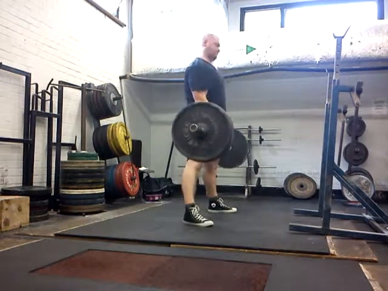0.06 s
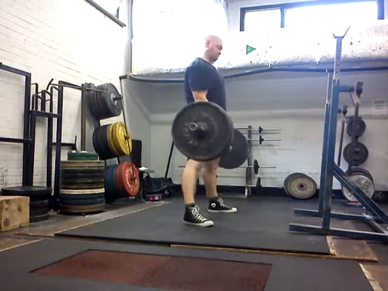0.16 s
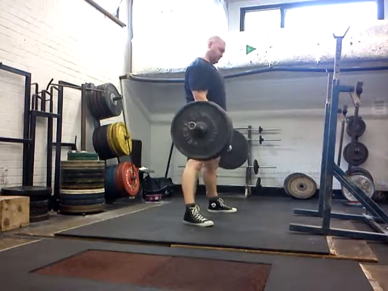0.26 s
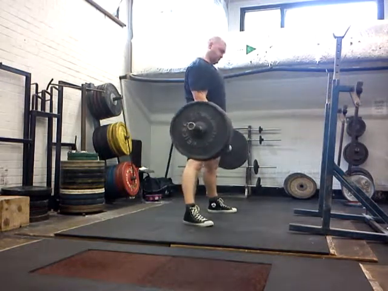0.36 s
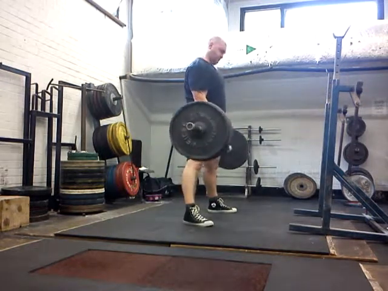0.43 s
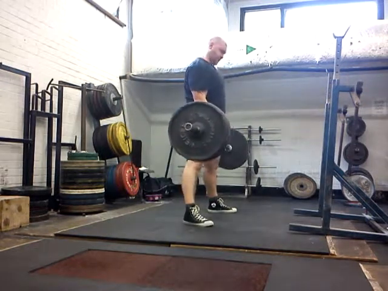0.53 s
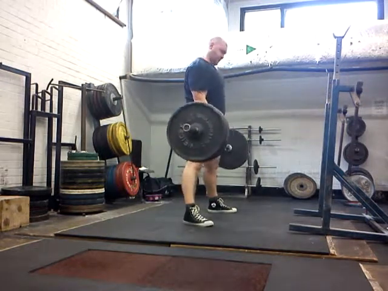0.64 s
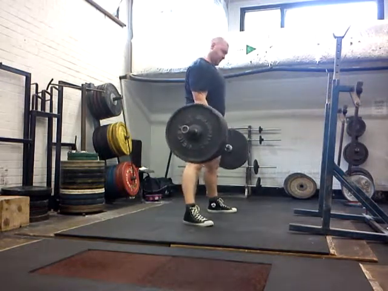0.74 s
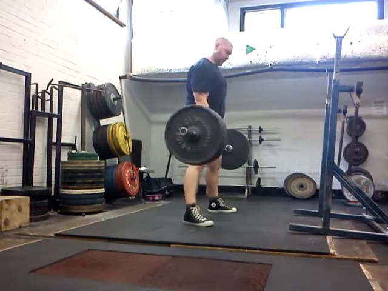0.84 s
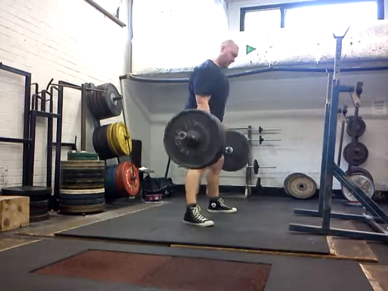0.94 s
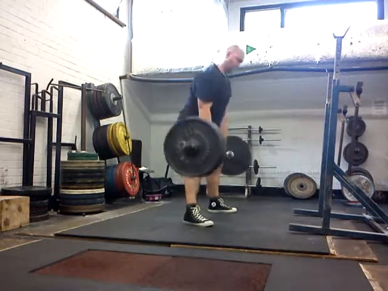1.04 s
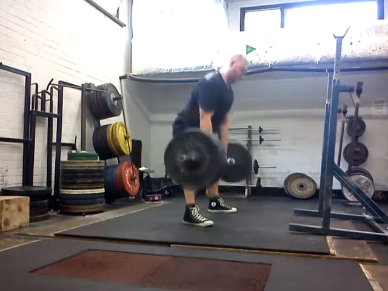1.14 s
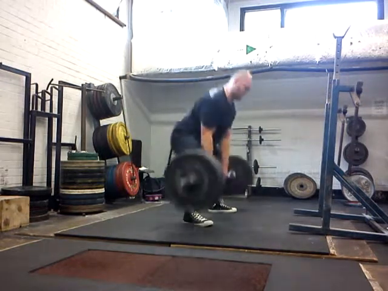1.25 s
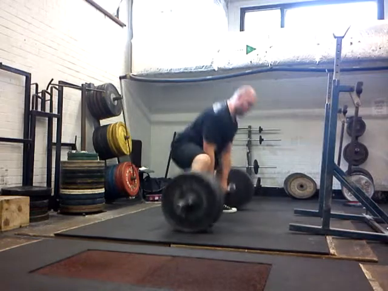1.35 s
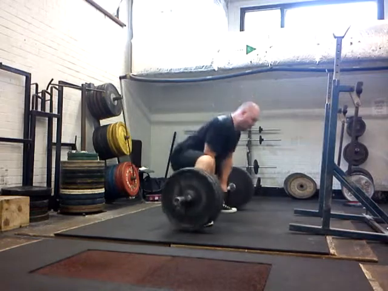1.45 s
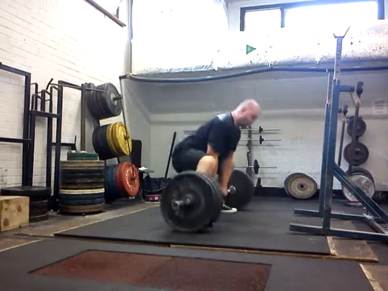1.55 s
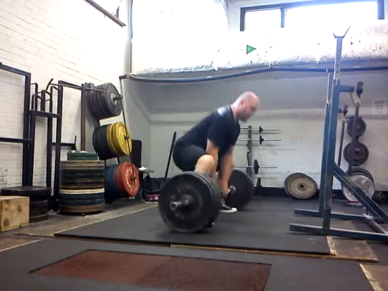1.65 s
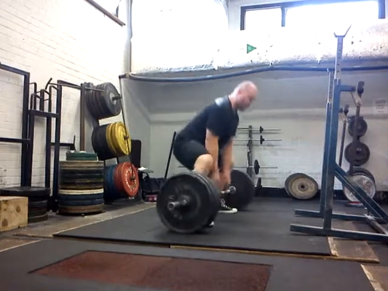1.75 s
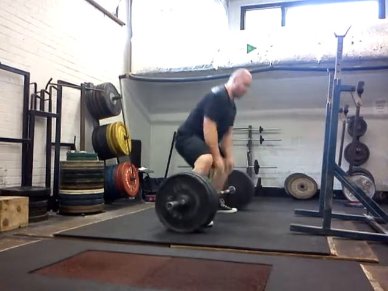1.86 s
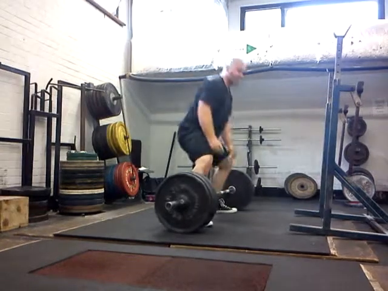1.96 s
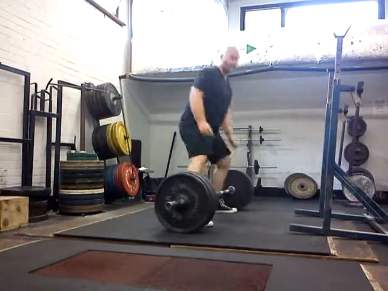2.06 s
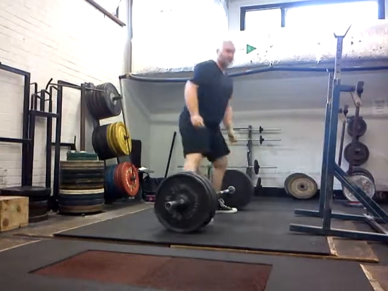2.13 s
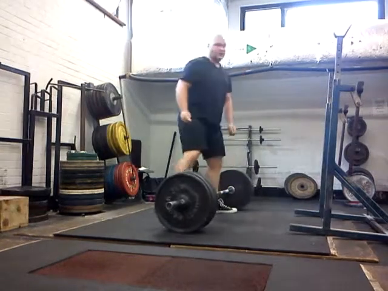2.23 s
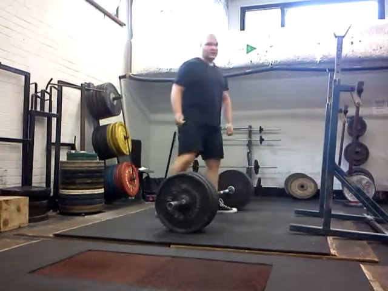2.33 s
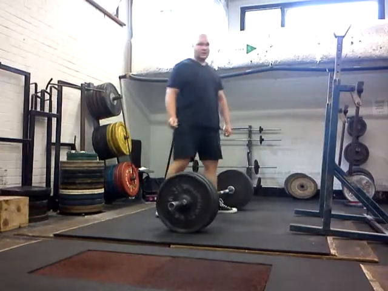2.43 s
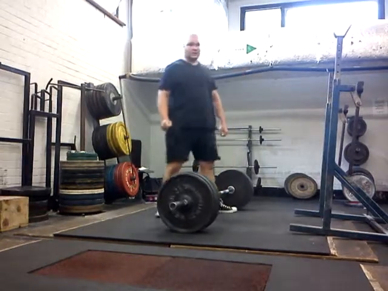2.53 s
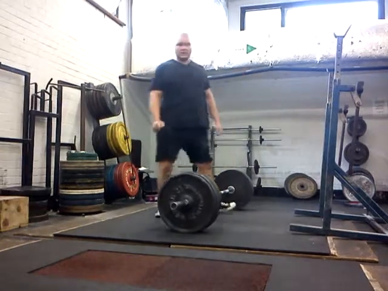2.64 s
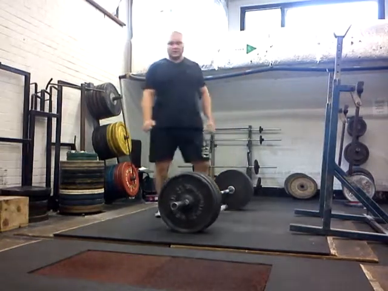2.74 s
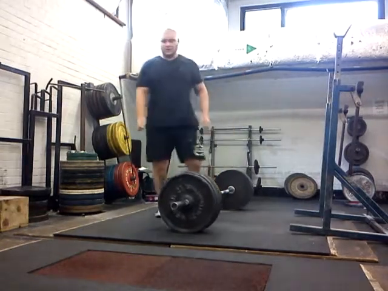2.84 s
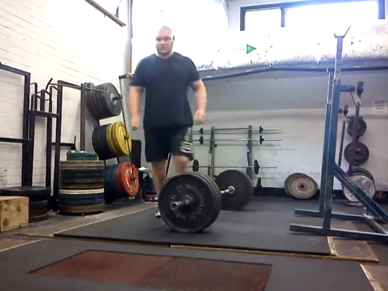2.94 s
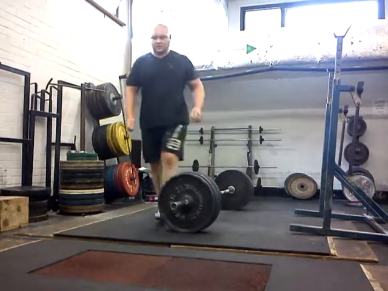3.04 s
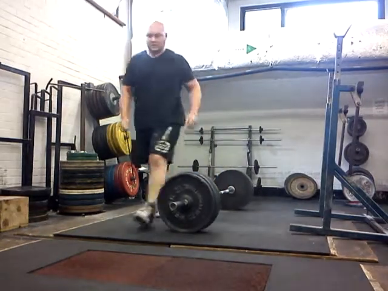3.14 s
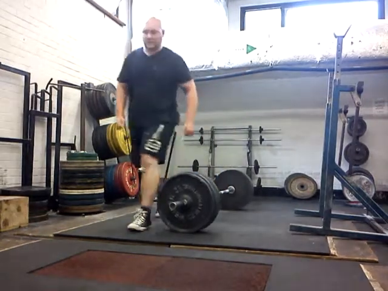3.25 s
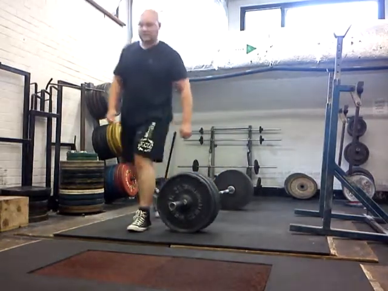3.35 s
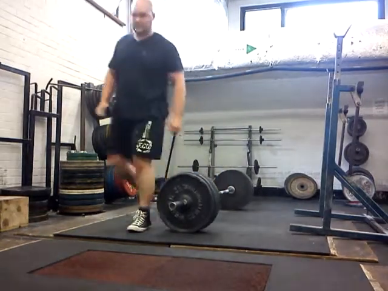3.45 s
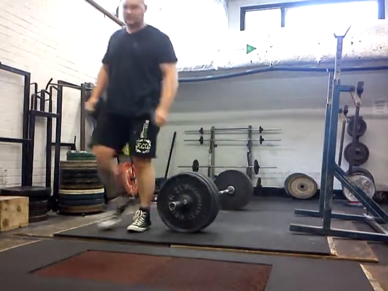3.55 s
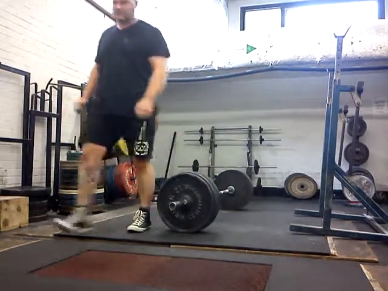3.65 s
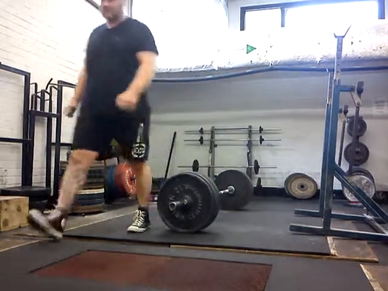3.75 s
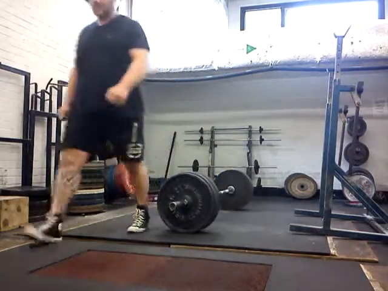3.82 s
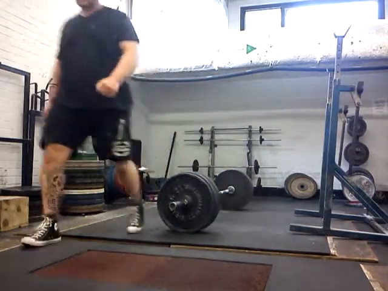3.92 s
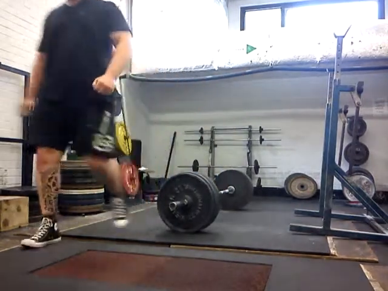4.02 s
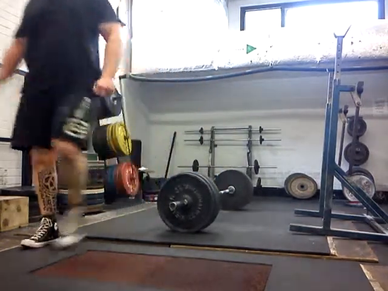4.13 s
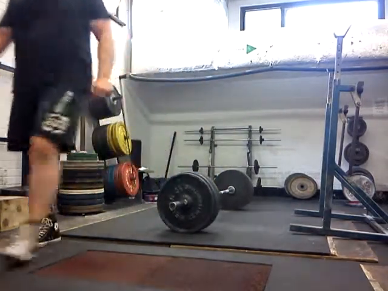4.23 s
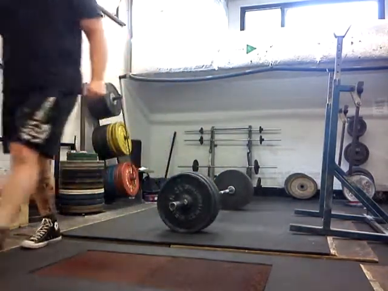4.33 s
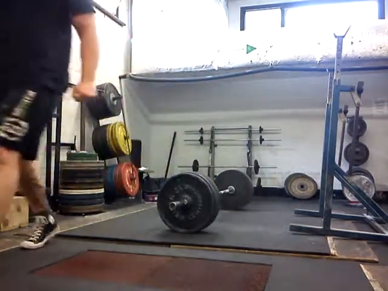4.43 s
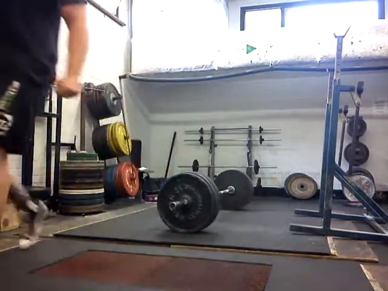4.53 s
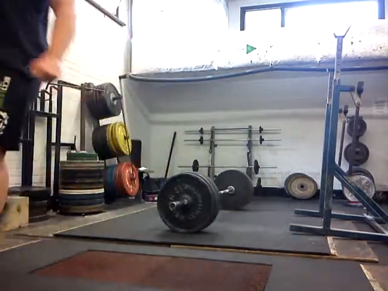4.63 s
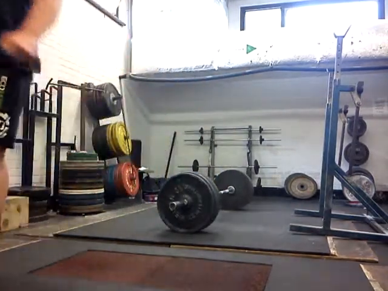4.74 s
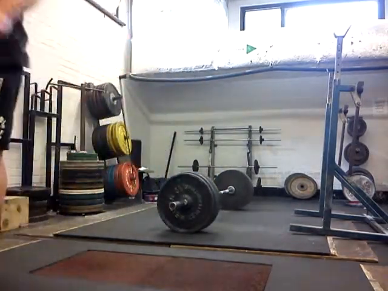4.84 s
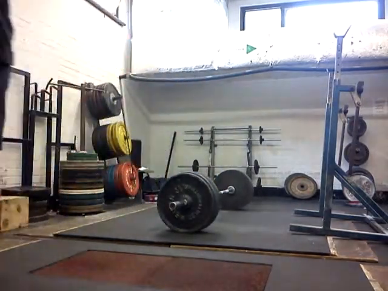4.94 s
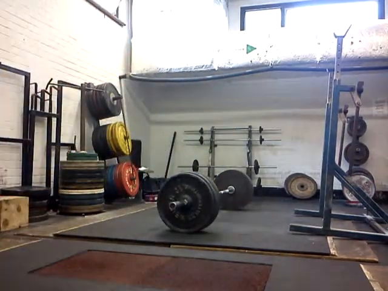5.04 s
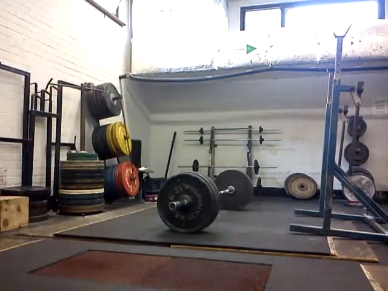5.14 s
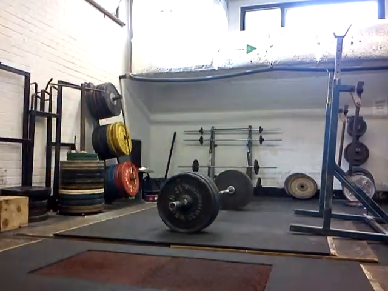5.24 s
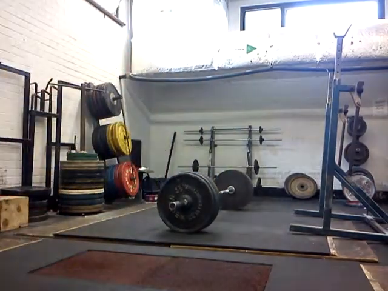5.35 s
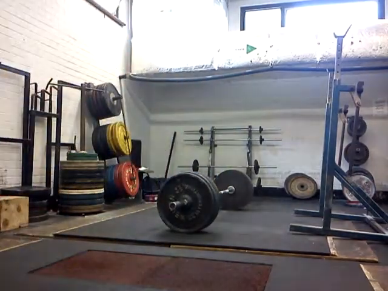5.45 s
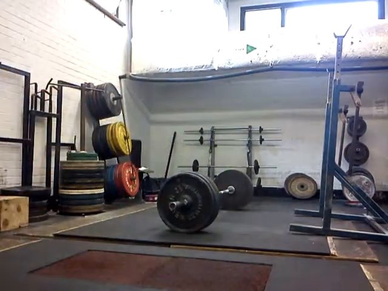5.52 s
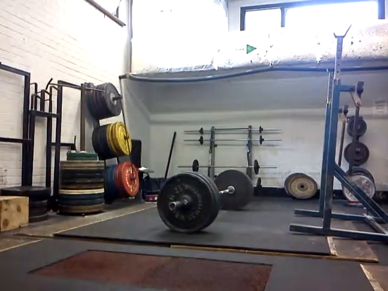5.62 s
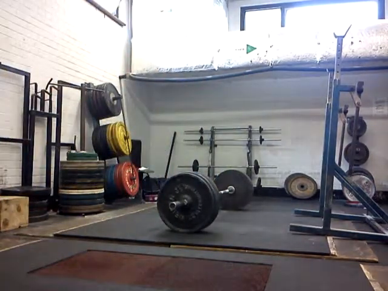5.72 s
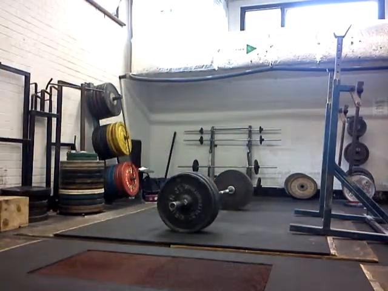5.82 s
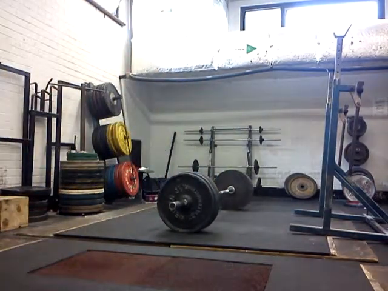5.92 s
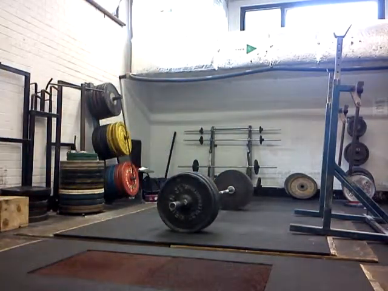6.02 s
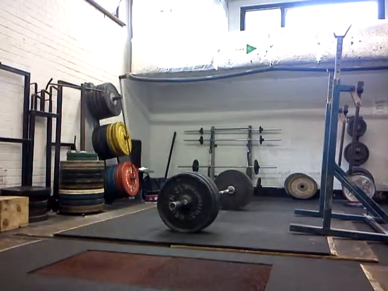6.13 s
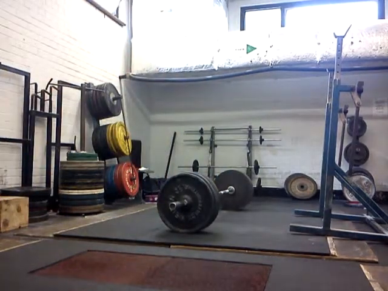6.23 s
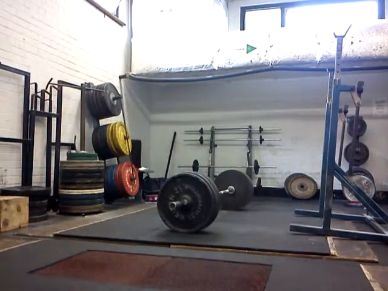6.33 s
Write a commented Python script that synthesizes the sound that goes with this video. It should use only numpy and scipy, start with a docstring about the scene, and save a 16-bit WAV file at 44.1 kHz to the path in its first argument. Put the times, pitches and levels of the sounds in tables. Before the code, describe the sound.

In a hard-walled gym, a fan drones with a throbbing low hum and airy hiss while a metallic room ring fades. A loaded barbell then slams onto rubber: a deep thud and harsh iron clash, quick rebounds and rattling plates. The narrow, muffled microphone overloads and ducks; the drone swells back as a few soft shoe scuffs pass.

```python
"""A hard-walled gym: a loaded barbell lands on the rubber floor, then the lifter walks off in soft shoes.
Filtered noise gives the thud of the rims, the clash of iron and the scuffs of the soles; decaying sines ring
the loose plates. A fan drones throughout: a beating motor hum, weak tones, rumble and a hiss of air.
A room ring fades at the start. A narrow-band microphone turns its gain down at the crash, clips the peaks
and lets the drone swell back."""
import sys
import numpy as np
from scipy import signal
from scipy.fft import rfft, irfft, next_fast_len
from scipy.io import wavfile
from scipy.ndimage import uniform_filter1d

SR = 44100
rng = np.random.default_rng(int(sys.argv[2]) if len(sys.argv) > 2 else 0)


def wav_out(sig):
    """Save sig, one row per channel (or a flat mono array), as 16-bit PCM at SR to the path in sys.argv[1]."""
    wavfile.write(sys.argv[1], SR, np.round(np.clip(np.atleast_2d(sig).T, -1, 1) * 32767).astype(np.int16))


N = 281290
TIME = np.arange(N) / SR

# All levels in the tables are relative; each layer has its own trim.
# The motor hum beats, now faster, now slower; a beat depth of 0 dB dips to silence:
# (time [s], pitch [Hz], level [dB], beat rate [1/s], beat depth [dB])
MOTOR_HUM = [(0.0, 195.9, -29.8, 6.29, -3.6), (0.55, 196.4, -20.9, 6.03, -1),
             (0.75, 196.2, -21.7, 3.48, -3.7), (1.3, 194.8, -28.3, 7.15, -10.5),
             (2.4, 194.9, -25.6, 1.44, -4.8), (3.2, 194.0, -20.6, 2.42, -5.2),
             (4.8, 192.5, -19.9, 6.35, -5.3), (5.0, 192.9, -19.1, 5.86, -11.8),
             (5.55, 194.0, -17.9, 4.43, -15.3), (5.85, 195.1, -24.4, 4.13, -1),
             (6.38, 196.6, -20.2, 3.76, -5.0)]
# Weaker machine tones of the fan: (centre pitch [Hz], level [dB])
MACHINE_TONES = [(141.5, -33), (231, -42), (323, -41), (414.5, -42), (464, -52), (554.5, -47.5),
                 (785, -44.5)]
# Spectrum of the fan's rumble: (frequency [Hz], density [dB per Hz])
RUMBLE_SPECTRUM = [(20, -39.5), (50, -22), (85, -16.5), (108, -10), (126, -2.5), (145, -1), (162, -2.5),
                   (180, -5.5), (230, -13.5), (380, -16), (600, -23), (1200, -48)]
# Spectrum of the fan's hiss of air: (frequency [Hz], density [dB per Hz])
HISS_SPECTRUM = [(100, -22.5), (400, -11), (700, 0.5), (880, 1), (1050, 5), (1350, 5), (1650, 3.5),
                 (1950, 3), (2350, -1), (2800, 0), (3350, 2.5), (4500, -1)]
# Slow course of the airy hiss: (time [s], level [dB])
HISS_COURSE = [(1.0, -28), (2.9, -28.5), (3.9, -30.5), (4.4, -29.5), (5.05, -32.5), (6.3, -28.5)]
# Fading ring in the room as the lift tops out: (frequency [Hz], width [Hz], peak level [dB])
ROOM_RING_PEAKS = [(480, 200, -11.5), (684, 90, -6.5), (1077, 100, -2), (1185, 16, 3.5), (1232, 16, 3.5),
                   (1326, 35, -11), (1530, 21, -21), (1609, 51, 2), (1810, 290, -23), (1984, 39, -6)]
# The rims meet the rubber, landing and rebound: (time [s], level [dB])
RIM_THUMPS = [(1.393, -12.5), (1.402, -2), (1.568, -4.5), (1.66, -11.5), (1.834, -18.5)]
# The rubber floor taking the weight: (frequency [Hz], density [dB per Hz])
THUD_SPECTRUM = [(25, -25.5), (70, -10.5), (135, -2.5), (230, -9), (500, -8), (900, -7.5), (3500, -11)]
# The loose plates slam together at the landing and at each rebound:
# (time [s], strength [dB], hardness [dB per octave], fall of the rattle [dB per s])
PLATE_SLAMS = [(1.3999, 2, 2, 41.5), (1.565, -2, 2, 15.5), (1.6501, -3.5, 3, 37), (1.731, -7, 2, 31),
               (1.8362, -9.5, 0.5, 10), (1.87, -10, 4, 134.5)]
# The short clash of iron on iron: (frequency [Hz], density [dB per Hz])
CLASH_SPECTRUM = [(40, -27), (130, -9.5), (300, -6.5), (600, -4), (860, -6), (1030, 1.5), (1300, 0),
                  (1650, -1), (2000, 4.5), (2450, -0.5), (2750, 2.5), (3020, 1), (3300, 2.5), (4500, 2.5)]
# Ringing modes of the plates and bar: (centre pitch [Hz], level [dB], T60 [s])
IRON_MODES = [(962, 3, 0.24), (990, -15, 0.3), (1017, 2, 0.24), (990, -11, 0.95), (1036, 6.5, 0.4),
              (1100, -2, 0.17), (1140, -4, 0.92), (1364, -11.5, 0.9), (1690, -15, 0.22), (2133, -9.5, 0.18),
              (1985, -1.5, 1), (2215, -18, 0.93), (2000, -6, 0.24), (2480, -11.5, 0.5), (2590, -12.5, 0.22),
              (2934, 1, 0.43), (3010, -5.5, 0.19), (3080, -8, 0.65), (3074, -1, 0.87), (2900, -9.5, 1),
              (3320, -3, 0.31), (3240, -17, 1), (3703.4, -23, 0.46)]
# Soft shoes on the mats: (time [s], level [dB])
SHOE_STEPS = [(2.964, -25.5), (3.311, -19.5), (3.7908, -21), (4.333, -22), (4.5537, -39), (4.863, -25),
              (5.5673, -29)]
# Scuff of a sole: (frequency [Hz], density [dB per Hz])
SCUFF_SPECTRUM = [(60, -6), (300, -10.5), (700, -1.5), (1400, -3), (2200, -14.5), (4000, -11)]
# Pass band of the microphone: (frequency [Hz], gain [dB])
MIC_RESPONSE = [(20, -0.5), (3400, 2.5), (3600, -4.5), (3800, -11.5), (4000, -16), (4300, -25),
                (4600, -43.5), (4900, -83.5)]

ROOM_T60_S, ECHO_BUILD_UP_S = 1.0, 0.012
# Knocks come further apart as the bar settles; the scatter is a fraction of the gap.
RATTLE_GAP_S, GAP_GROWTH_S_PER_S, GAP_SCATTER = 0.018, 0.027, 0.2
# Weaker knocks are duller: most hardness lost, and the scale of level fall over which it goes.
SOFTEN_DB_PER_OCT, SOFTEN_SPAN_DB = 8, 4.5
CLIP_PEAK, CUTOFF_HZ = 0.73, 15900


def undb(db):
    """Decibels to gain."""
    return np.exp(np.asarray(db) * (np.log(10) / 20))


def level(x, db=0):
    """Scale to an rms level in dB."""
    return x * undb(db) / np.sqrt(np.mean(x ** 2))


def curve(points):
    """Join (time, value) rows by straight lines."""
    return np.interp(TIME, *np.vstack(points).T)


def spectrum_gain(bins, points):
    """Gain at each bin, drawn in straight lines of dB over log frequency."""
    hz, db = np.transpose(points)
    return undb(np.interp(np.log(bins), np.log(hz), db))


def colour(x, points):
    """Filter by a (frequency, dB) spectrum."""
    size = next_fast_len(N + SR, True)
    bins = np.maximum(np.fft.rfftfreq(size, 1 / SR), 1)
    return irfft(rfft(x, size) * spectrum_gain(bins, points), size)[:N]


def noise(points):
    """Noise of a given spectrum below 4800 Hz, at rms 1."""
    size = next_fast_len(N, True)
    bins = np.maximum(np.arange(0, 4800, SR / size), 1)
    spectrum = rng.standard_normal(len(bins)) + 1j * rng.standard_normal(len(bins))
    return level(irfft(spectrum * spectrum_gain(bins, points), size)[:N])


def walk(rate):
    """Random drift with an rms of 1 that gets a new target rate times a second."""
    knots = rng.standard_normal(2048)
    return level(np.interp(TIME * rate, np.arange(len(knots)), knots))


def fade(start, t60):
    """A sudden start and an exponential decay that falls 60 dB in t60 seconds."""
    return (TIME >= start) * np.exp(-np.log(1000) * np.clip((TIME - start) / t60, 0, 10))


def tone(hz):
    """A sine of rms 1 that follows a pitch curve from a random phase."""
    return np.sqrt(2) * np.sin(2 * np.pi * (np.cumsum(hz) / SR + rng.random()))


def gym(x, wet_db):
    """Direct sound plus the dense echo of the brick walls, which builds up over a few milliseconds."""
    tail = rng.standard_normal(N) * fade(0, ROOM_T60_S) * (1 - np.exp(-TIME / ECHO_BUILD_UP_S))
    echo = signal.fftconvolve(x, tail / np.linalg.norm(tail))[:N]
    return x + undb(wet_db) * echo


def motor(waver_hz, shiver_db):
    """A hum that swells and dips like two close tones beating."""
    times, *columns = np.transpose(MOTOR_HUM)
    pitch, level_db, rate, depth_db = (np.interp(TIME, times, column) for column in columns)
    turning = np.exp(2j * np.pi * np.cumsum(rate) / SR)
    beat = np.abs(1j + undb(depth_db) * turning)
    return tone(pitch + waver_hz * walk(7.9)) * beat * undb(level_db + shiver_db * walk(22))


def fan(hum_db, tones_db, rumble_db, hiss_db, flutter_db, surge_db):
    """A throbbing motor hum, weak wavering tones, low surging rumble and a fluttering hiss of air."""
    hum = undb(hum_db) * motor(waver_hz=0.44, shiver_db=1.0)
    tones = np.zeros(N)
    for hz, db in MACHINE_TONES:
        tones += tone(hz + 1.2 * walk(8)) * undb(db + tones_db + 2.2 * walk(3))
    rumble = noise(RUMBLE_SPECTRUM) * undb(rumble_db + surge_db * walk(14))
    hiss = noise(HISS_SPECTRUM) * undb(curve(HISS_COURSE) + hiss_db + flutter_db * walk(18))
    return hum + tones + rumble + hiss


def top_ring(db, t60):
    """Noise through narrow resonances, dying away in the room from the very start."""
    bins = np.fft.rfftfreq(N, 1 / SR)
    shape = np.zeros(len(bins))
    for hz, width, peak_db in ROOM_RING_PEAKS:
        shape += undb(peak_db) / (1 + (2 * (bins - hz) / width) ** 2)
    resonance = irfft(rfft(rng.standard_normal(N)) * shape, N)
    return level(resonance, db) * fade(0, t60)


def rattle(count):
    """Every slam sets off a run of ever weaker, duller knocks: their times, forces and hardness."""
    start, strength_db, hardness, fall = np.transpose(PLATE_SLAMS)[:, :, None]
    nth = np.arange(count)
    gap = RATTLE_GAP_S + GAP_GROWTH_S_PER_S * (start - start[0])
    # the slam itself (knock 0) stays exactly on time
    scatter = GAP_SCATTER * rng.standard_normal((len(PLATE_SLAMS), count)) * (nth > 0)
    age = gap * (nth + scatter)
    before_next = start + age + gap / 2 < np.vstack([start[1:], [np.inf]])
    lost_db = fall * age
    dulled = hardness - SOFTEN_DB_PER_OCT * np.tanh(lost_db / SOFTEN_SPAN_DB)
    force = undb(strength_db - lost_db)
    return (start + age)[before_next], force[before_next], dulled[before_next]


def chatter(spectrum, depth_db, shimmer_db):
    """Many small contacts: the level stutters, and each band of the noise shimmers on its own."""
    edges = np.linspace(30, 4830, 13)
    total = np.zeros(N)
    for band in zip(edges, edges[1:]):
        sos = signal.butter(3, band, "bandpass", fs=SR, output="sos")
        total += signal.sosfilt(sos, noise(spectrum)) * undb(shimmer_db * walk(40))
    return level(total * undb(depth_db * walk(220)))


def ring(times, force, hardness, scatter_db, waver, buzz_db):
    """Each knock feeds the iron modes in its own proportions; harder contacts favour the high ones."""
    starts = (times * SR).astype(int)
    share = undb(scatter_db * rng.standard_normal((len(starts), len(IRON_MODES))))
    turn = np.exp(2j * np.pi * rng.random(share.shape))  # random phase of each blow
    out = np.zeros(N)
    for k, (hz, db, t60) in enumerate(IRON_MODES):
        tilt = undb(hardness * np.log2(hz / 1800))
        blows = np.zeros(N, complex)
        blows[starts] = force * share[:, k] * turn[:, k] * tilt
        decay = np.exp(-np.log(1000) / (t60 * SR))
        swing = signal.lfilter([1], [1, -decay], blows)
        # the plates rock against each other, so the pitch and strength of every mode waver
        phase = 2 * np.pi * np.cumsum(hz * (1 + waver * walk(70))) / SR
        out += undb(db + buzz_db * walk(45)) * np.abs(swing) * np.sin(phase + np.angle(swing))
    return out


def barbell(crash_db, ring_db, clash_t60, thud_t60):
    """The rims thud on the rubber; the loose plates clash and ring again and again as the bar settles."""
    times, force, hardness = rattle(count=7)
    # knocks overlap as independent noises do: their powers add
    contact = np.sqrt(sum((f * fade(s, clash_t60)) ** 2 for s, f in zip(times, force)))
    clash = chatter(CLASH_SPECTRUM, depth_db=0.5, shimmer_db=3.5) * contact
    thud = noise(THUD_SPECTRUM) * sum(undb(db) * fade(s, thud_t60) for s, db in RIM_THUMPS)
    iron = undb(ring_db) * ring(times, force, hardness, scatter_db=2.5, waver=0.0055, buzz_db=5.5)
    return undb(crash_db) * (gym(clash + thud, wet_db=-0.5) + gym(iron, wet_db=-8.5))


def footsteps(t60):
    """Short noise scuffs of flat soles, each with a sudden start and a quick decay."""
    scuffs = sum(undb(db) * fade(s, t60) for s, db in SHOE_STEPS)
    return gym(noise(SCUFF_SPECTRUM) * scuffs, wet_db=-6.0)


def scene():
    """Everything that reaches the microphone."""
    drone = fan(hum_db=-0.54, tones_db=-1.0, rumble_db=-24.0, hiss_db=4.0, flutter_db=1.0, surge_db=1.68)
    room_ring = top_ring(db=-13.5, t60=1.03)
    crash = barbell(crash_db=15.5, ring_db=-17.5, clash_t60=0.13, thud_t60=0.13)
    steps = footsteps(t60=0.098)
    return (drone + room_ring + crash + steps)[None]


def gain_control(x, limit_db, ratio, release_db_per_s, window_s):
    """The gain drops within milliseconds when the sound passes the limit and climbs back steadily."""
    power = uniform_filter1d(x ** 2, max(int(window_s * SR), 2))
    over_db = np.maximum(10 * np.log10(np.maximum(power, 1e-12)) - limit_db, 0)
    wanted_cut_db = over_db * (1 - 1 / ratio)
    # a running maximum on a rising ramp holds each cut and releases it at the ramp's slope
    climb_db = release_db_per_s * TIME
    cut_db = np.maximum.accumulate(wanted_cut_db + climb_db) - climb_db
    return x * undb(-uniform_filter1d(cut_db, size=64))


def record(dry):
    """Narrow pass band, gain control, hard clipping of the highest peaks and the final cut-off."""
    narrow = colour(dry[0], MIC_RESPONSE)
    held = gain_control(narrow, limit_db=-11.0, ratio=10.2, release_db_per_s=24.5, window_s=0.012)
    clipped = np.clip(held, -CLIP_PEAK, CLIP_PEAK)
    low_pass = signal.ellip(8, 0.2, 80, CUTOFF_HZ, fs=SR, output="sos")
    return signal.sosfilt(low_pass, clipped)[None]


dry = scene()
out = record(dry)
wav_out(out)
```